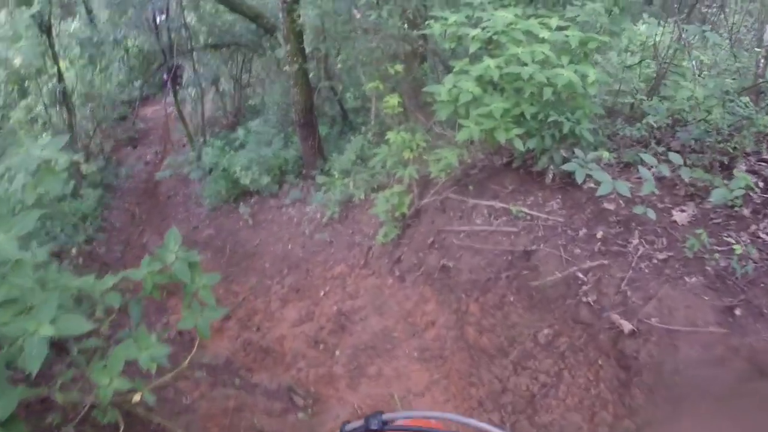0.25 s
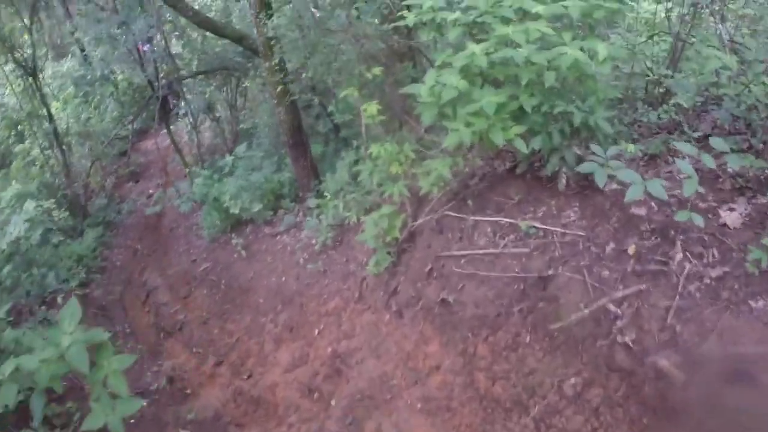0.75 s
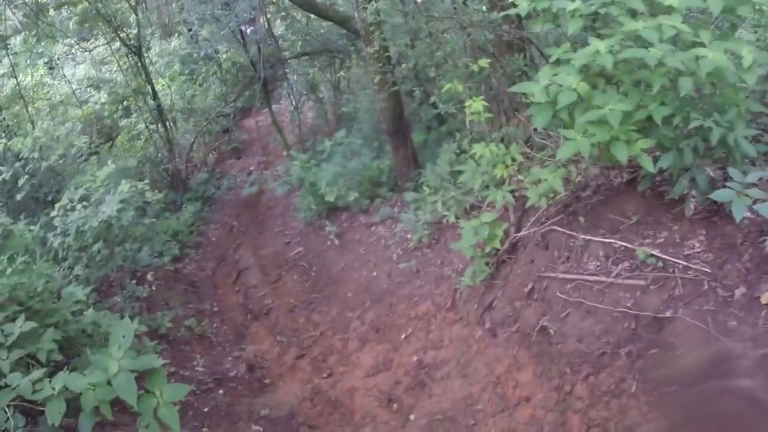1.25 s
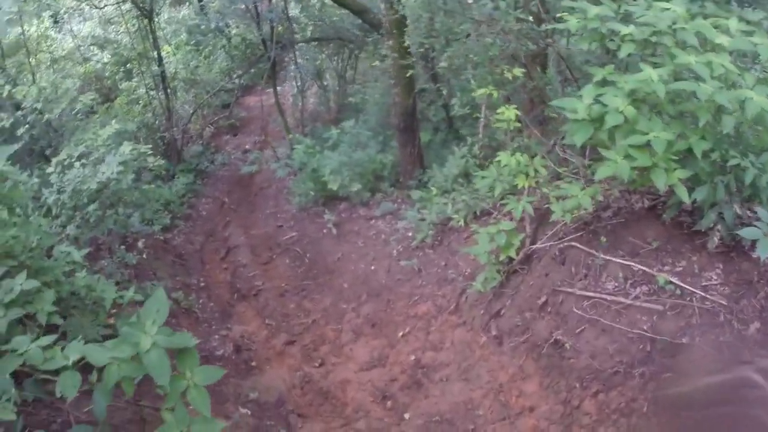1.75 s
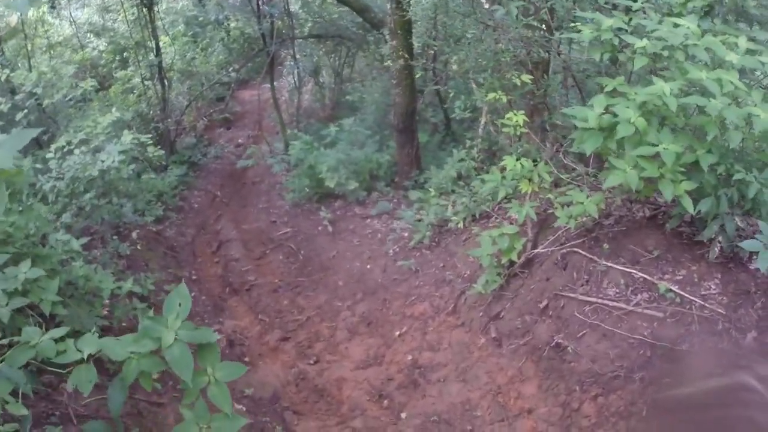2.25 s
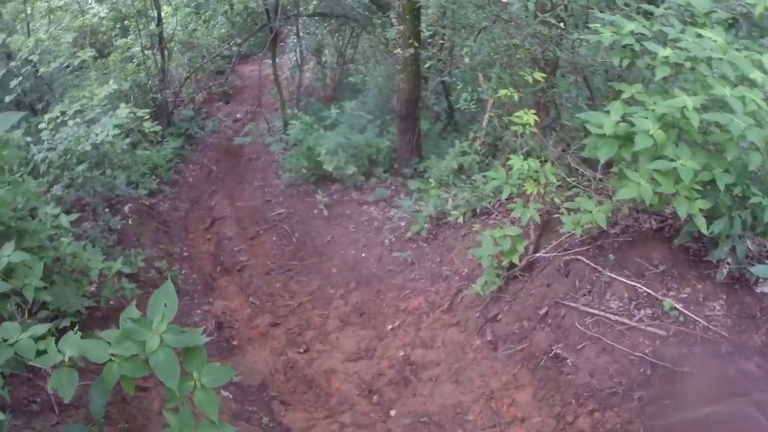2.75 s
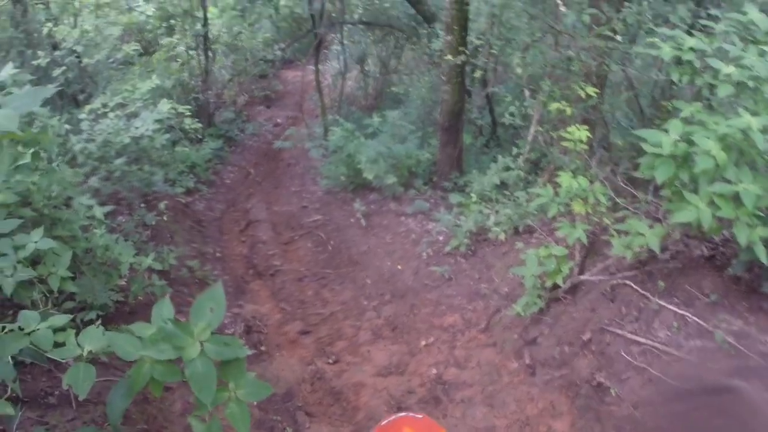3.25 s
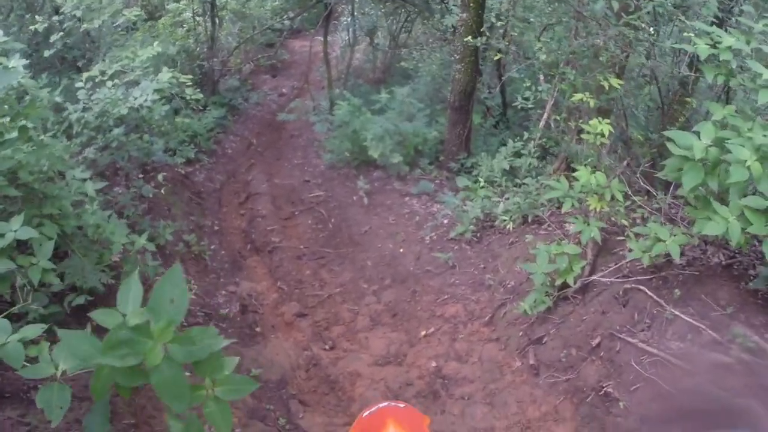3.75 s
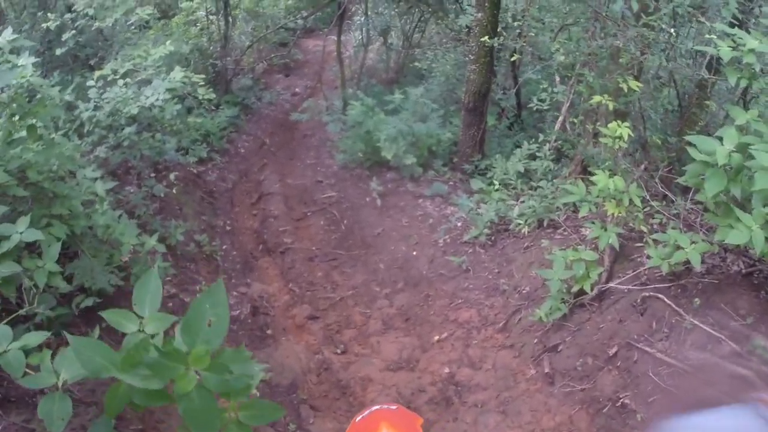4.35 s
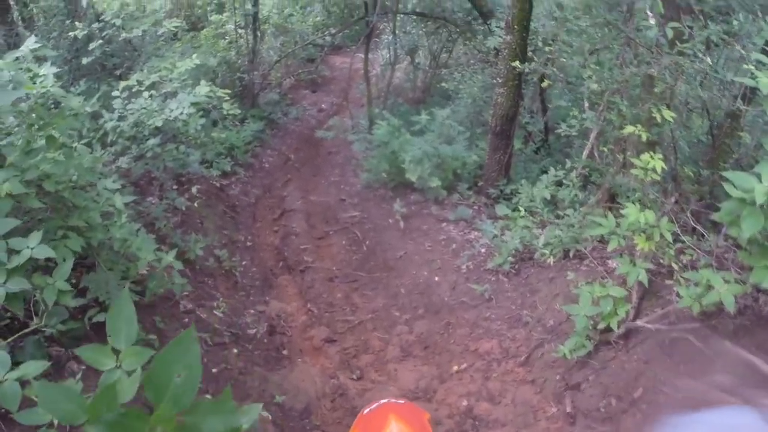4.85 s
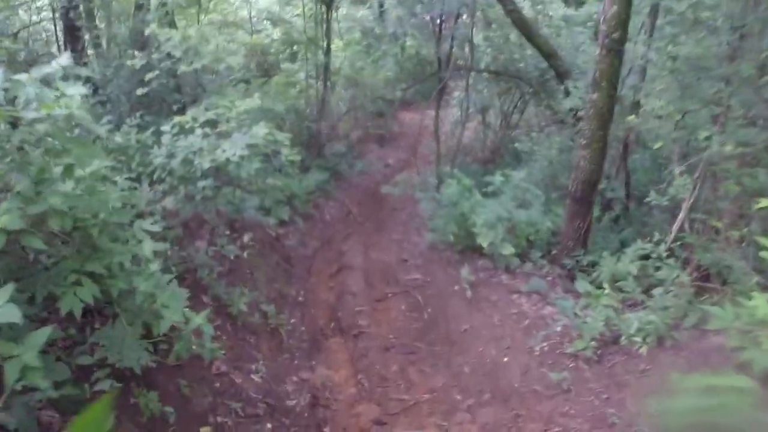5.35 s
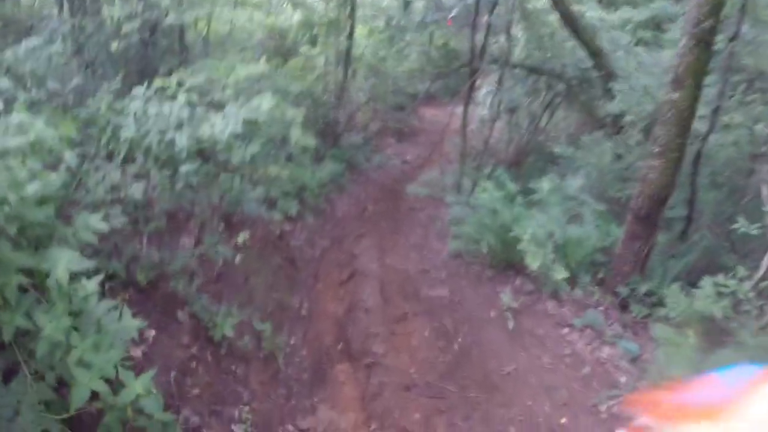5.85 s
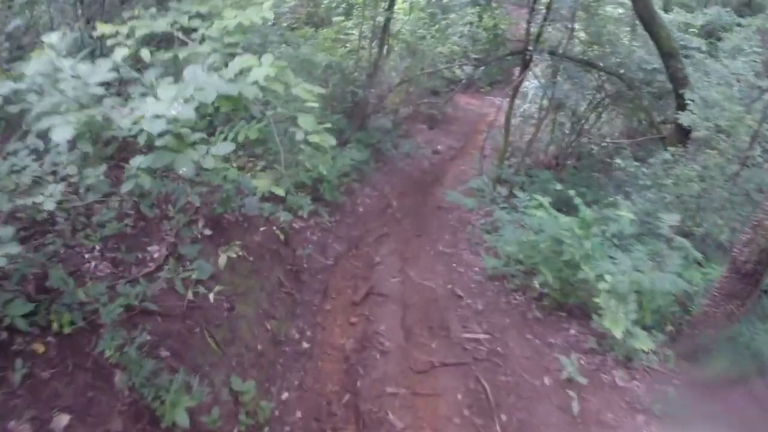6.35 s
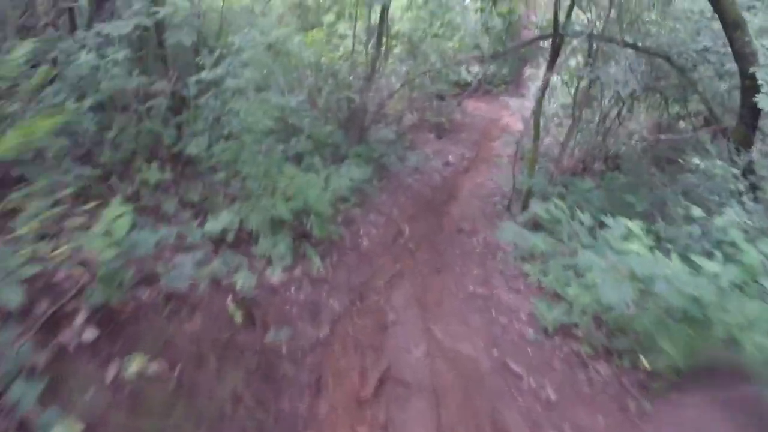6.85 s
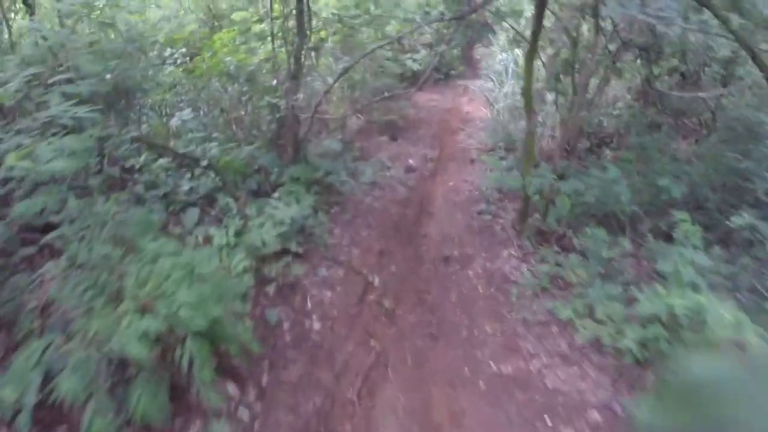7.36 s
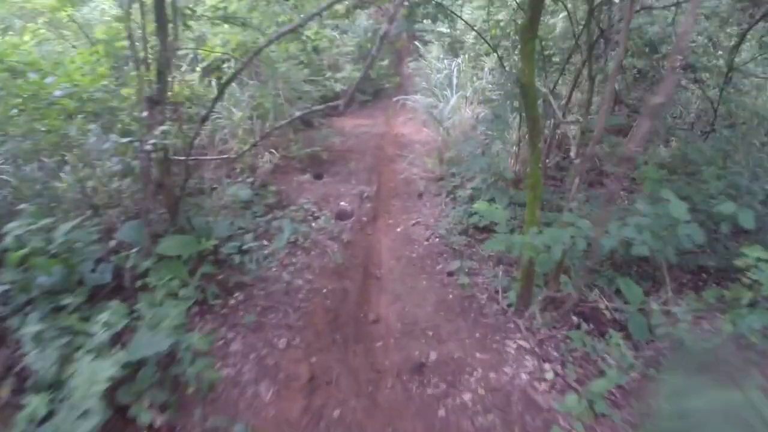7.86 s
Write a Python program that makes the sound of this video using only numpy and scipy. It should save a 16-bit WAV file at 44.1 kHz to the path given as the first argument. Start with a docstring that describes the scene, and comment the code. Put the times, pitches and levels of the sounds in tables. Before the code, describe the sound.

A two-stroke dirt bike pops slowly, revs once, then coasts along a forest trail with rattles and one sharp branch crack.

```python
"""The popping exhaust of a two-stroke dirt bike on a muddy forest trail, heard from the rider's camera.
Each burn is an impulse that excites the resonances of the exhaust. The engine sinks to a slow idle, is
blipped once, then coasts downhill, misfiring. Impacts make the tyres rumble, the suspension thud and the
frame clank; brush scrapes past, with thin squeaks. Near 6 s a branch cracks against the camera, and its
limiter ducks the gain for about half a second."""
import sys
import numpy as np
from scipy import signal
from scipy.fft import rfft, irfft
from scipy.io import wavfile
from scipy.ndimage import uniform_filter1d

SR = 44100
rng = np.random.default_rng(int(sys.argv[2]) if len(sys.argv) > 2 else 0)


def master_out(mix):
    """Clip the mix to full scale and print it as 16-bit PCM to the path in sys.argv[1]."""
    frames = np.transpose(np.atleast_2d(mix))
    ceiling = np.clip(frames, -1, 1)
    pcm = np.round(ceiling * 32767).astype(np.int16)
    wavfile.write(sys.argv[1], SR, pcm)


N = 357210
TIME, RING_TIME = np.arange(N) / SR, np.arange(SR // 8) / SR
CUTOFF_HZ = 15300

# Bumps that jolt the frame. Each row: start in seconds, relative level in dB.
BUMPS = [(0.267, -3), (0.36, -11), (0.749, -8.5), (6.414, -15), (6.656, -14.5), (6.702, -12.5),
         (6.808, -20), (6.979, -11), (7.012, -16), (7.147, -17), (7.172, -10.5), (7.349, -10), (7.369, -13),
         (7.463, -8.5), (7.493, -7.5), (7.51, -9), (7.594, -13), (7.948, -16), (8.02, -11)]


def firings(first_cycle=.126):
    """A two-stroke fires once per turn. Each row returned: seconds, burn in dB, load, firings per second."""
    # Each row: time in seconds, firings per second.
    engine_speed = [(0.0, 23.644), (0.34, 24.805), (0.509, 23.561), (0.586, 25.337), (1.418, 20.676),
                    (2.183, 12.616), (2.52, 11.225), (3.061, 11.567), (3.255, 17.737), (3.427, 40.627),
                    (3.781, 43.024), (3.918, 35.32), (3.97, 39.375), (4.15, 26.41), (4.591, 18.838),
                    (4.697, 19.982), (4.827, 11.137), (6.089, 11.408), (6.277, 9.041), (8.1, 8.605)]
    # Each row: time in seconds, relative strength of the burn in dB.
    burn_strength = [(0, -10), (.2, -7.5), (.27, -7), (.55, -6), (.72, -14.5), (1.3, -7.5), (2.35, -10),
                     (2.52, -16), (3.12, -17.5), (3.22, -2), (3.44, -11), (3.58, -18), (3.745, -11),
                     (3.85, -22), (3.915, -12), (3.98, -11.5), (4.15, -11), (5.8, -17), (6.4, -25)]
    # Each row: time in seconds, engine load from 0 to 1.
    engine_load = [(.18, 0.22), (.33, 0.63), (1.6, 0.67), (3.1, 0.44), (3.22, 0.23), (3.38, 0.79),
                   (4.01, 0.7), (4.08, 0.09), (5.3, 0.48)]
    # Misfires, and hard burns on unspent fuel. Each row: time in seconds, dB against their neighbours.
    uneven_burns = [(.091, -4), (.217, -18), (3.454, -22), (4.052, -8), (4.228, -12), (4.353, -4.5),
                    (4.443, -10.5), (4.54, 2), (4.592, -9), (4.645, 2), (4.697, -2.5), (4.915, -3),
                    (5.0, -6), (5.71, 1.5), (5.8, -4), (5.974, -5), (6.475, -18), (7.035, -20), (7.714, 7)]
    turns = np.cumsum(curve(engine_speed)[0]) / SR - first_cycle
    times = TIME[1:][np.diff(np.floor(turns)) > 0]
    burn_db = curve(burn_strength, times)[0] + rng.normal(0, .7, len(times))
    for s, db in uneven_burns:
        burn_db[np.argmin(np.abs(times - s))] += db
    return np.transpose([times, burn_db, *curve(engine_load, times), *curve(engine_speed, times)])


def exhaust(burns, bark_rise_s=.006, pipe_rise_s=.009, open_firings_per_s=34, muffler_hz=680):
    """Cavity resonance: each burn booms in the expansion chamber, barks in the silencer, rings the pipe."""
    # Fixed resonances. Each row: frequency in Hz, bandwidth in Hz, relative level in dB.
    boom_modes = [(88.2, 10, -11)]
    bark_modes = [(220, 55, 1.5), (259, 42, 8.5), (301, 12.1, -1.5), (340, 66, -6), (564, 100, -19),
                  (650, 79, -21.5)]
    # Each row: firings per second, then gains in dB of the boom, its deepest mode, the bark, the tailpipe.
    balance = [(11, 1.5, 0.5, -12, -23.5), (15.2, 1, 1, -7, -15.5), (21.3, 1, -15.5, -6.5, -16),
               (27, 1, -21, -1.5, -19.5), (36, 0, -8.5, 1, -14), (41.5, 1.5, 0, 4.2, -11)]
    # The chamber's lingering hum. Each row: firings per second, level in dB against its broad mode.
    hum_level = [(11, 1.5), (22, -15), (25, 1.5), (40, -14)]
    # Each row: time in seconds, tailpipe resonance in Hz.
    pipe_note = [(.5, 491), (1.55, 489), (2.1, 454), (3.5, 430)]
    out = np.zeros(N)
    for s, db, load, speed in burns:
        boom_db, deep_db, bark_db, pipe_db = curve(balance, speed)
        hum_db, = curve(hum_level, speed)
        heat = load - .5   # load heats the gas: a higher chamber note, a louder bark and tailpipe
        chamber_hz = 135.5 + 78 * heat
        chamber_modes = [(69, 14, deep_db), (chamber_hz, 62, 0), (chamber_hz, 15, hum_db)]
        boom_rise_s = .005 + .007 * (1 - load)
        boom = ring(boom_modes + chamber_modes, boom_rise_s, detune=.035, scatter_db=1.5)
        bark = ring(bark_modes, bark_rise_s, detune=.015, scatter_db=1.5)
        # on the open throttle the tailpipe speaks earlier and more broadly
        pipe_lag_s, width_hz = (-.00095, 48) if speed > open_firings_per_s else (.0058, 34)
        tailpipe = ring([(curve(pipe_note, s)[0], width_hz, 0)], pipe_rise_s, detune=.006)
        add(out, s + .0019 - boom_rise_s, from_db(db + boom_db) * boom)
        add(out, s + .0007 - bark_rise_s, from_db(db + bark_db + 9 * heat) * bark)
        add(out, s + pipe_lag_s - pipe_rise_s, from_db(db + pipe_db + 26.5 * heat) * tailpipe)
    radiated = butterworth(out, 50, "high")   # the small open end radiates no deep bass
    return butterworth(radiated, muffler_hz, "low", order=6)


def pinging(burns, ping_db=-22, rasp_db=-31, rasp_s=.012):
    """Shock excitation: hard burns set the cylinder fins and pipe wall ringing, and spit a rasp of gas."""
    # Fins and wall. Each row: frequency in Hz, bandwidth in Hz, relative level in dB.
    metal_modes = [(1120, 110, 4.5), (1305, 70, 4.5), (1710, 380, 1), (2380, 89, -1.5), (3230, 170, 3.5),
                   (4700, 130, -12), (5460, 390, -14.5), (6000, 460, -15.5)]
    # The burns harden as the throttle is blipped. Each row: time in seconds, gain in dB.
    harshness = [(3.13, -21), (3.2, -12), (3.255, -7.5), (3.335, -5.5), (3.373, 2), (3.43, 1), (3.485, 3.5),
                 (3.53, -4), (3.6, -0.5), (3.67, -4.5), (3.765, 2.5), (3.83, -8), (3.91, -4.5), (4.0, -.5),
                 (4.1, -21)]
    # Each row: frequency in Hz, relative spectral density in dB.
    rasp_spectrum = [(480, 15), (650, 7.5), (800, -3), (1000, -3), (2400, -2.5), (3300, 1.5), (4000, -14),
                     (4700, -1.5), (6800, -12.5), (8300, -21.5), (11500, -19.5), (13000, -28.5)]
    pings, spit, window = np.zeros(N), np.zeros(N), np.hanning(SR // 75)
    for s, db, _, _ in burns:
        force_db = db + curve(harshness, s)[0]
        metal = ring(metal_modes, rise_s=.0003, detune=.012, scatter_db=1.5)
        ping = signal.fftconvolve(metal, window * rng.standard_normal(len(window)))
        add(pings, s - len(window) / SR / 2, from_db(force_db + ping_db) * ping / np.abs(ping).max())
        add(spit, s - rasp_s / 2, from_db(force_db + rasp_db) * np.exp(-RING_TIME / rasp_s))
    return pings + spit * colour(rng.standard_normal(N), rasp_spectrum)


def branch(start_s=5.9813, rise_s=.0011, knock_db=15.5, splinter_db=4.5, tail_db=-18):
    """Impact and fracture: a branch rings the camera housing and splinters in a fast-dying noise burst."""
    # Each row: frequency in Hz, bandwidth in Hz, relative level in dB.
    housing_modes = [(557, 78, -3.5), (1064, 77, -2.5), (1330, 90, -1.5), (1707, 180, 1.5), (2340, 210, -4),
                     (3890, 190, -5), (5950, 350, -16), (7320, 350, -15)]
    # Each row: frequency in Hz, relative spectral density in dB.
    splinter_spectrum = [(600, -3.5), (1000, -1.5), (1900, -2), (2800, -1), (3450, -9), (3900, -9),
                         (4400, -23.5), (4900, -12), (7400, -17), (8300, -36.5), (13500, -40)]
    knock, envelope = np.zeros(N), np.zeros(N)
    add(knock, start_s, from_db(knock_db) * ring(housing_modes, rise_s))
    after_s = np.maximum(RING_TIME - rise_s, 0)
    decay = from_db(splinter_db) * np.exp(-after_s / .0017) + from_db(tail_db) * np.exp(-after_s / .0093)
    add(envelope, start_s, np.minimum(RING_TIME / rise_s, 1) ** 2 * decay)
    return knock + envelope * colour(rng.standard_normal(N), splinter_spectrum)


def shaking(rattle_db=-8, rattle_s=.036):
    """Incoherent vibrations add in power: the ground's shaking plus a dying rattle after each bump."""
    # How hard the tyres work on the ground. Each row: time in seconds, level in dB.
    ground = [(.1, -22.5), (.35, -25.5), (.6, -24.5), (1.35, -33.5), (2.05, -26), (2.6, -30), (3.1, -28.5),
              (3.35, -27), (4.35, -34), (4.75, -30), (5.2, -28), (5.65, -27), (5.92, -20.5), (6.15, -34.5),
              (6.55, -31), (6.9, -24.5), (7.08, -26), (7.22, -21.5), (7.5, -16), (7.72, -25.5), (8.05, -24)]
    power = from_db(curve(ground)[0]) ** 2
    for s, db in BUMPS:
        add(power, s, (from_db(db + rattle_db) * np.exp(-RING_TIME / rattle_s)) ** 2)
    return np.sqrt(power)


def tyres(shake, gain_db=-5.5, lumpy_db=2.5):
    """Structure-borne sound: knobs and stones drum through the frame, merging into a lumpy rumble."""
    # Each row: frequency in Hz, relative spectral density in dB.
    rumble_spectrum = [(25, -17), (60, -2.5), (95, 0.5), (170, -6), (240, -1.5), (330, -2.5), (450, 1),
                       (530, -6), (640, -14.5), (800, -27), (1200, -39), (2000, -46.5)]
    drumming = colour(grains(per_s=900, spread_db=-.5), rumble_spectrum)
    return shake * from_db(gain_db + lumpy_db * drift(per_s=40)) * drumming


def suspension(width_ratio=.64, overtone_db=-9, dull_hz=700):
    """A heavily damped oscillator: each root or rut gives a dull thud that builds over one cycle."""
    # Each row: time in seconds, level in dB, frequency in Hz.
    thuds = [(.2395, -7, 135), (.289, -8, 130), (0.3336, -9, 140), (0.3644, -2.5, 150), (0.3928, -6, 160),
             (0.4503, -14, 150), (0.482, -13, 145), (4.727, -15, 100), (4.928, -13, 126),
             (5.054, -15.5, 115), (5.12, -15.5, 130), (5.258, -11.5, 110), (5.473, -14.5, 131),
             (5.657, -15, 120), (5.83, -19, 170), (5.879, -14, 85), (6.9833, -1, 373), (7.149, -9.5, 179)]
    out = np.zeros(N)
    for s, db, hz in thuds:
        modes = [(hz, width_ratio * hz, 0), (2 * hz, width_ratio * hz, overtone_db)]
        add(out, s - 1 / hz, from_db(db) * ring(modes, rise_s=1 / hz, detune=.02, scatter_db=1))
    return butterworth(out, dull_hz, "low", order=4)


def jolts(gain_db=-1.5):
    """Free vibration: the frame and its plastic panels ring briefly after each bump."""
    # Each row: frequency in Hz, bandwidth in Hz, relative level in dB.
    frame_modes = [(170, 90, -11), (276, 150, 19), (428.8, 20, 15), (487.7, 15, 12), (590, 290, -4),
                   (1160, 59, -18), (1236, 57, -11), (1880, 78, -43)]
    out = np.zeros(N)
    for s, db in BUMPS:
        add(out, s, from_db(db + gain_db) * ring(frame_modes, rise_s=.00275, detune=.06, scatter_db=2))
    return out


def clanks(shake, random_db=-23, loose_db=-27):
    """Impact rattle: the chain and loose parts ring at set hard knocks, and at random when shaken."""
    # Each row: frequency in Hz, bandwidth in Hz, relative level in dB.
    part_modes = [(513, 27, 6.5), (720, 59, -3), (1087, 60, 1), (1330, 83, -2.5), (1560, 160, -6.5),
                  (1770, 210, -12), (2560, 70, -9), (3550, 91, -18), (4660, 180, -11.5)]
    # Each row: start in seconds, peak level in dB.
    hard_knocks = [(.581, -31), (2.058, -26), (2.076, -28.5), (4.979, -25), (5.476, -26), (6.655, -31),
                   (6.694, -22), (6.811, -29.5), (7.011, -23), (7.075, -28), (7.114, -26), (7.132, -27),
                   (7.168, -23), (7.212, -20.5), (7.35, -23), (7.357, -19), (7.406, -23), (7.474, -30),
                   (7.491, -16), (7.568, -23), (7.675, -24), (8.018, -23.5)]
    force = shake ** 2 / (shake + from_db(loose_db))   # falls away quickly below loose_db
    knocks = force * grains(per_s=140, spread_db=2)
    response = ring(part_modes, rise_s=.001)
    out = from_db(random_db) * signal.fftconvolve(knocks, response / np.linalg.norm(response))[:N]
    for s, db in hard_knocks:
        add(out, s, from_db(db) * ring(part_modes, rise_s=.0018, detune=.025, scatter_db=3))
    return out


def rolling():
    """Low-frequency noise from the rolling bike fills the gaps between the pops."""
    # Each row: time in seconds, rms level in dB.
    roll_level = [(0, -20), (1.0, -41), (3.2, -41.5), (4.4, -31), (5.9, -31.5), (6.3, -47)]
    # Each row: frequency in Hz, relative spectral density in dB.
    roll_spectrum = [(28, -18), (60, -1.5), (95, 5.5), (140, 0), (200, -6.5), (300, -28.5)]
    return from_db(curve(roll_level)[0]) * colour(rng.standard_normal(N), roll_spectrum)


def brush(gain_db=7.5, attack_s=.0012):
    """Friction noise: stems and dirt drag over the bike in short bursts of dense crackle."""
    # Each row: start in seconds, relative level in dB, decay time in seconds.
    scrapes = [(0.124, -37.5, 0.017), (0.196, -25.5, 0.023), (0.252, -30, 0.024), (0.632, -39, 0.015),
               (0.73, -44, 0.058), (0.813, -44.5, 0.015), (0.929, -51, 0.039), (2.175, -44.5, 0.041),
               (2.539, -48, 0.013), (4.804, -48.5, 0.023), (4.879, -49.5, 0.0099), (4.998, -33, 0.013),
               (5.225, -51, .02), (5.474, -45, 0.012), (5.534, -49, .025), (5.781, -44.5, 0.035),
               (5.929, -40, 0.013), (6.408, -41.5, 0.027), (6.69, -35.5, 0.031), (6.971, -40.5, 0.015),
               (7.007, -38.5, 0.027), (7.164, -42.5, 0.04), (7.345, -37, 0.016), (7.408, -29.5, 0.0082),
               (7.488, -30, .016), (7.571, -40.5, 0.052), (8.018, -48, 0.005)]
    # Each row: frequency in Hz, relative spectral density in dB.
    scrape_spectrum = [(300, 20), (800, 3.5), (1090, 1.5), (1200, 5.5), (1340, 0), (2000, -0.5), (2600, -2),
                       (4700, -5.5), (6800, -11.5), (8500, -21), (11500, -19.5), (15000, -43)]
    envelope, attack = np.zeros(N), 1 - np.exp(-RING_TIME / attack_s)
    for s, db, decay_s in scrapes:
        add(envelope, s, from_db(db + gain_db) * attack * np.exp(-(RING_TIME / decay_s) ** 2))
    return envelope * colour(grains(per_s=4000, spread_db=3), scrape_spectrum)


def clatter(shake, engine_db=-59, grit_db=-27, flicker_db=2):
    """Two noises add in power: the engine's mechanical hiss, and grit that flies as the bike is shaken."""
    # Each row: frequency in Hz, relative spectral density in dB.
    grit_spectrum = [(500, 2.5), (850, 3.5), (1090, -3), (1200, -3), (1330, -0.5), (1700, -3.5),
                     (2000, -7.5), (2550, -6.5), (3300, -7.5), (4000, -15.5), (4700, -10), (6500, -18),
                     (8300, -27.5), (10300, -27), (13000, -33.5), (15000, -38)]
    noise = colour(rng.standard_normal(N) + .41 * grains(per_s=490, spread_db=-3.5), grit_spectrum)
    envelope = np.hypot(from_db(engine_db), from_db(grit_db) * shake)
    return envelope * from_db(flicker_db * drift(per_s=70)) * noise


def twigs(gain_db=-9.5):
    """Brittle fracture: thin dry twigs break with a tick of high, quickly damped modes."""
    # Each row: start in seconds, relative level in dB.
    snaps = [(.127, -26), (2.543, -40), (6.303, -25.5), (6.493, -33), (6.77, -31), (6.815, -33),
             (6.901, -33), (7.778, -20.5)]
    # Each row: frequency in Hz, bandwidth in Hz, relative level in dB.
    twig_modes = [(6300, 400, -3), (7100, 350, 0), (7800, 400, -3)]
    out = np.zeros(N)
    for s, db in snaps:
        add(out, s, from_db(db + gain_db) * ring(twig_modes, rise_s=.0008, detune=.03, scatter_db=2.5))
    return out


def squeaks(gain_db=-6.5, waver=.018, rasp=.075, overtone_step_db=-6):
    """Random frequency modulation makes short harmonic tones unsteady and raspy."""
    # Each row: start and length in seconds, pitch in Hz, relative level in dB, octave overtone in dB.
    chirps = [(0.376, 0.042, 1916, -31.5, -7.5), (0.441, 0.19, 3300, -53, -22),
              (0.667, 0.045, 1790, -36, -9), (0.72, 0.053, 1463, -36, -8), (1.554, 0.28, 3320, -52, -34),
              (2.079, 0.25, 3320, -51, -40), (2.94, 0.051, 1416, -44, -5), (3.138, 0.052, 1710, -42, -4.5),
              (6.09, 0.11, 3480, -51, -41), (6.262, 0.013, 4650, -45, -17), (6.72, 0.14, 9500, -62, -58.5)]
    out = np.zeros(N)
    wobble = waver * drift(per_s=500) + rasp * drift(per_s=3000)
    for s, length_s, hz, db, octave_db in chirps:
        deviation_hz = min(hz, 3400) * wobble[int(s * SR):int((s + length_s) * SR)]
        phase = 2 * np.pi * np.cumsum(hz + deviation_hz) / SR
        overtones = sum(from_db(overtone_step_db * (k - 2)) * np.sin(k * phase)
                        for k in range(2, 6) if k * hz < CUTOFF_HZ)
        tone = rms_one(np.sin(phase) + from_db(octave_db) * overtones)
        add(out, s, from_db(db + gain_db) * np.sqrt(np.hanning(len(tone))) * tone)
    return out


def leaves(flicker_db=2):
    """Shot noise: dry leaves and crumbs of earth give countless fine clicks under the tyres."""
    # Each row: time in seconds, level in dB.
    rustle_level = [(1.0, -84.5), (2.2, -71.5), (4.1, -80), (4.7, -74.5), (5.55, -68), (5.78, -61.5),
                    (5.95, -66), (6.25, -72.5), (6.85, -70.5), (7.0, -61), (7.3, -65.5), (7.45, -58),
                    (7.7, -67), (8.05, -70)]
    # Each row: frequency in Hz, relative spectral density in dB.
    leaf_spectrum = [(4000, -5), (6500, 3), (8300, -2.5), (10000, 0.5), (11800, -1.5), (13000, -9),
                     (15000, -14.5)]
    crackle = colour(grains(per_s=2500, spread_db=4.5), leaf_spectrum)
    return from_db(curve(rustle_level)[0] + flicker_db * drift(per_s=45)) * crackle


def whine(tone_db=-83, tone_hz=13906, hiss_db=-81):
    """A pure tone and narrow-band noise, faint and steady, high in the treble."""
    hiss = rms_one(butterworth(rng.standard_normal(N), [9900, 10300], "band"))
    return from_db(tone_db) * np.sin(2 * np.pi * tone_hz * TIME) + from_db(hiss_db) * hiss


def ring(modes, rise_s, detune=0, scatter_db=0):
    """Damped modes swell over rise_s, then decay; pitch and level can scatter at random. Peak 1."""
    hz, width, db = np.transpose(modes)[:, :, None]
    pitch_draw, level_draw = rng.standard_normal((2, len(modes), 1))
    t = RING_TIME - rise_s
    swell = np.sin(np.pi / 2 * np.minimum(RING_TIME / rise_s, 1)) ** 2
    decay = np.exp(-np.pi * width * np.maximum(t, 0))
    waves = -np.sin(2 * np.pi * hz * (1 + detune * pitch_draw) * t) * decay
    sound = swell * np.sum(from_db(db + scatter_db * level_draw) * waves, axis=0)
    fade = np.minimum(4 * (1 - RING_TIME / RING_TIME[-1]), 1)
    return fade * sound / np.abs(sound).max()


def grains(per_s, spread_db):
    """A Poisson train of clicks of uneven size; rms 1."""
    size = from_db(spread_db * np.minimum(rng.exponential(1, N), 4)) * rng.choice([-1, 1], N)
    return rms_one(size * (rng.random(N) < per_s / SR))


def drift(per_s):
    """Random values joined by straight lines; rms 1."""
    return rms_one(np.interp(TIME * per_s, np.arange(N), rng.standard_normal(N)))


def colour(x, spectrum):
    """Filter x by a spectrum that falls 12 dB per octave beyond its ends; rms 1."""
    hz, db = np.transpose(spectrum)
    f = np.maximum(np.arange(N // 2 + 1) * SR / N, 1)
    gain = from_db(np.interp(np.log(f), np.log(hz), db))
    skirt = np.minimum(f / hz[0], 1) ** 2 * np.minimum(hz[-1] / f, 1) ** 2
    return rms_one(irfft(rfft(x) * gain * skirt, N))


def butterworth(x, hz, kind, order=2):
    """A filter with a maximally flat passband."""
    return signal.sosfilt(signal.butter(order, hz, kind, fs=SR, output="sos"), x)


def curve(rows, at=TIME):
    """Interpolate a table's later columns along its first."""
    knots, *columns = np.transpose(rows)
    return [np.interp(at, knots, column) for column in columns]


def add(out, s, sound):
    """Superpose a sound, starting at s seconds."""
    i = max(int(s * SR), 0)
    out[i:i + len(sound)] += sound[:max(N - i, 0)]


def from_db(db):
    """Decibels to amplitude ratio."""
    return 10 ** (np.asarray(db) / 20)


def rms_one(x):
    """Scale to unit rms."""
    return x / np.sqrt(np.mean(x ** 2) + 1e-20)


def scene():
    """Superposition: engine, bike and undergrowth sum at one close microphone."""
    burns, shake = firings(), shaking()
    engine = exhaust(burns) + pinging(burns)
    bike = tyres(shake) + clatter(shake) + rolling() + clanks(shake) + jolts() + suspension()
    undergrowth = leaves() + brush() + twigs() + branch()
    return (engine + bike + undergrowth + squeaks() + whine())[None]


def record(dry, release_db_per_s=26, threshold_db=3, ahead_s=.00039):
    """Peak limiting: the gain ducks just ahead of a peak and recovers slowly; then clipping and low-pass."""
    over_db = np.maximum(20 * np.log10(np.abs(dry[0]) + 1e-9) - threshold_db, 0)
    release_db = release_db_per_s * TIME
    held_db = np.maximum.accumulate(over_db + release_db) - release_db
    duck_db = np.interp(TIME + ahead_s, TIME, uniform_filter1d(held_db, size=30))
    clipped = np.clip(dry * from_db(-duck_db), -1, 1)
    return signal.sosfilt(signal.ellip(10, .1, 80, CUTOFF_HZ, fs=SR, output="sos"), clipped)


dry = scene()
out = record(dry)
master_out(out)
```